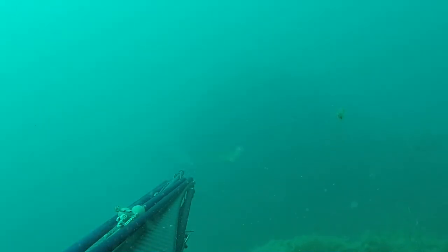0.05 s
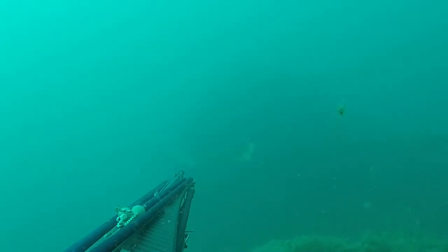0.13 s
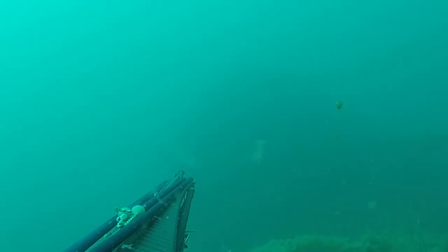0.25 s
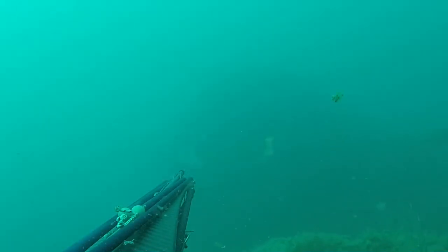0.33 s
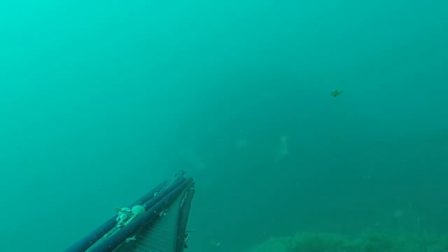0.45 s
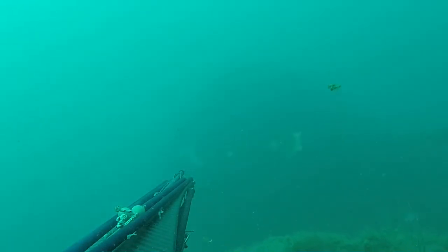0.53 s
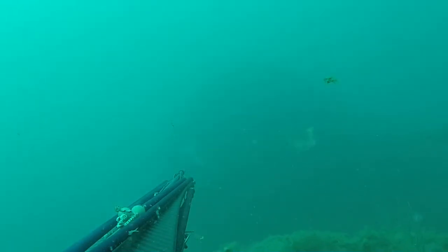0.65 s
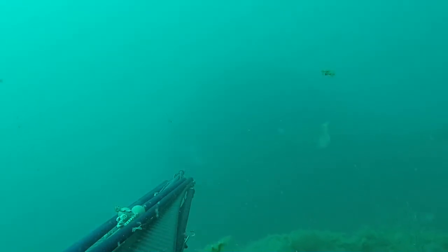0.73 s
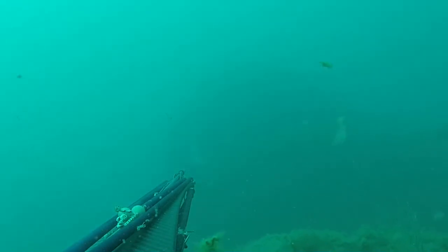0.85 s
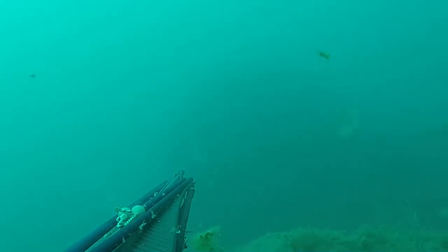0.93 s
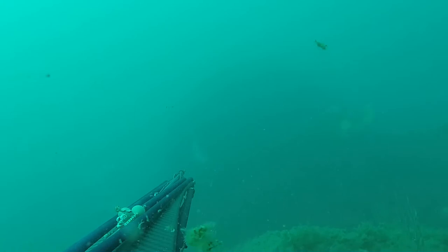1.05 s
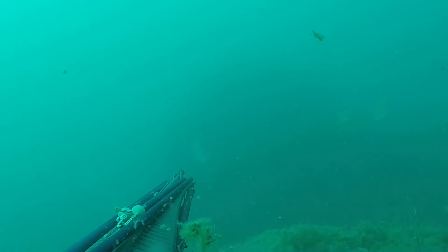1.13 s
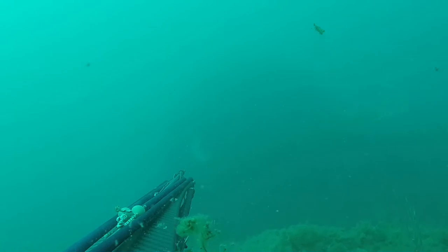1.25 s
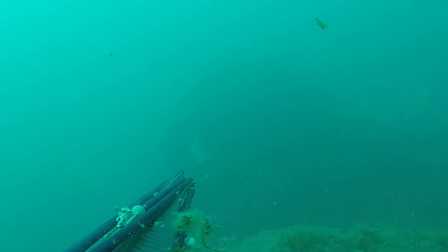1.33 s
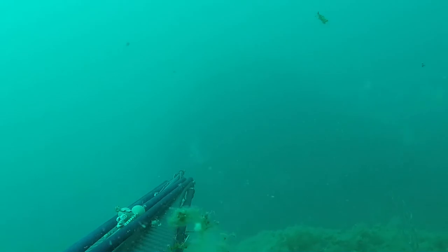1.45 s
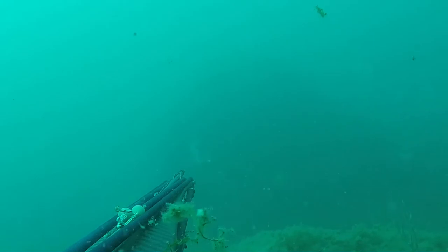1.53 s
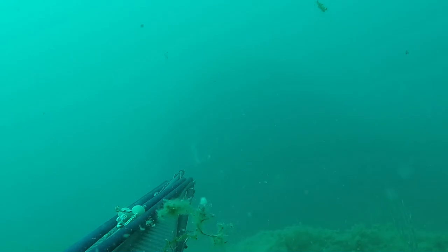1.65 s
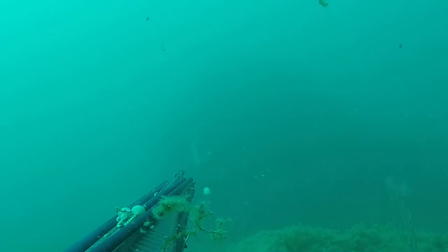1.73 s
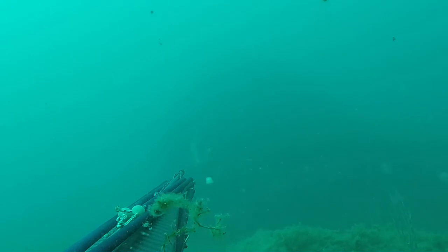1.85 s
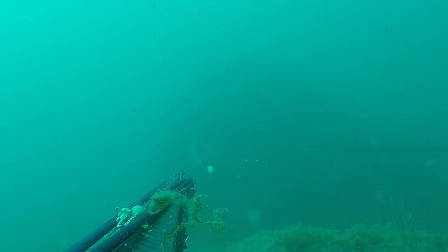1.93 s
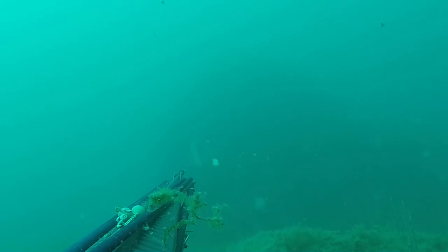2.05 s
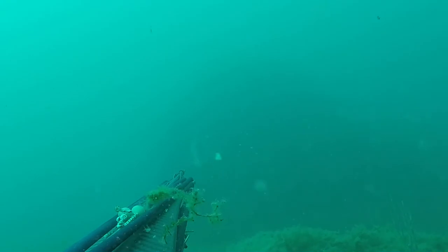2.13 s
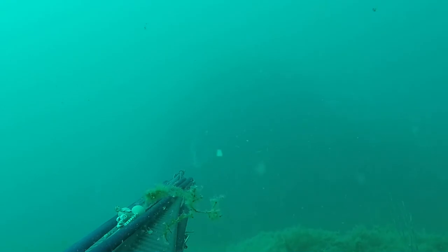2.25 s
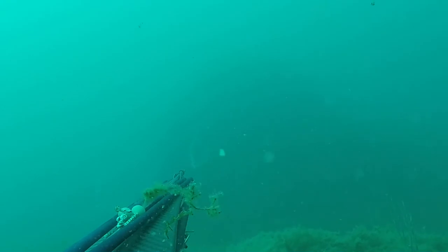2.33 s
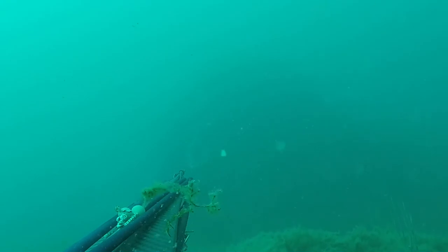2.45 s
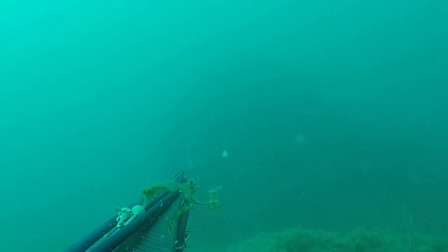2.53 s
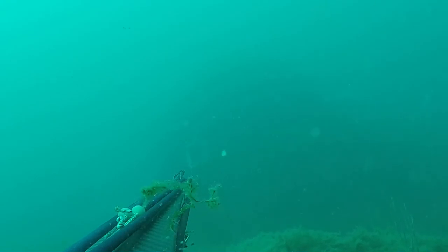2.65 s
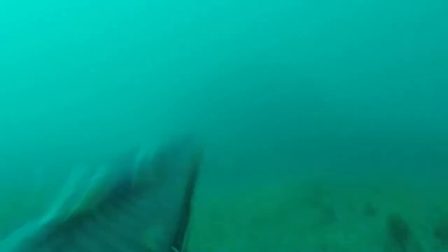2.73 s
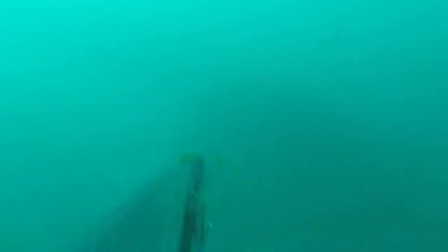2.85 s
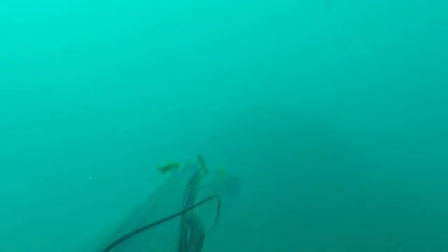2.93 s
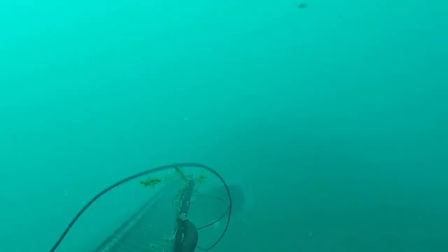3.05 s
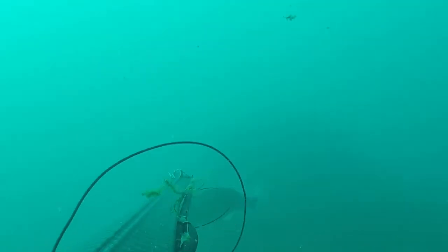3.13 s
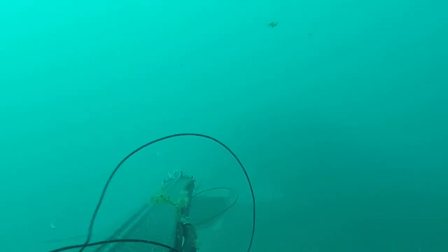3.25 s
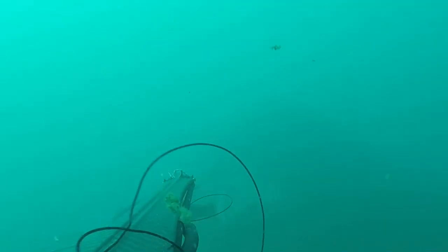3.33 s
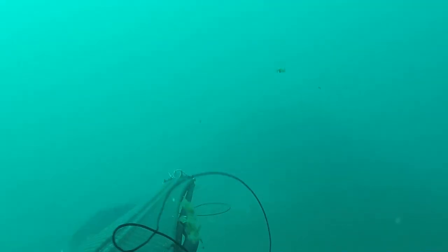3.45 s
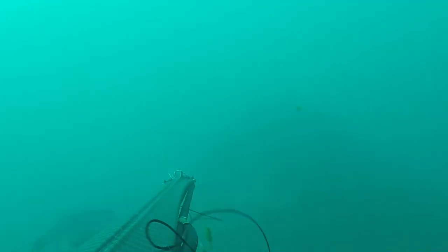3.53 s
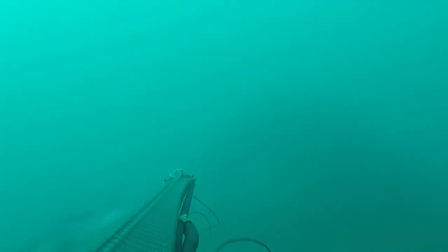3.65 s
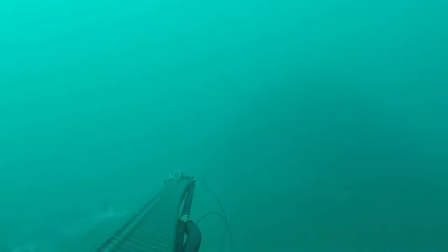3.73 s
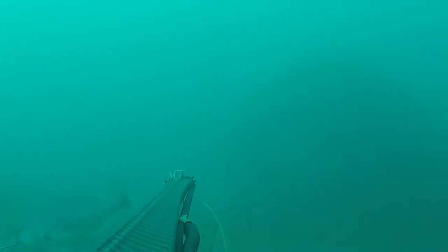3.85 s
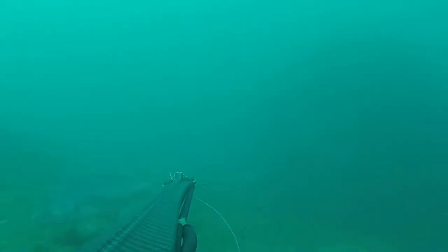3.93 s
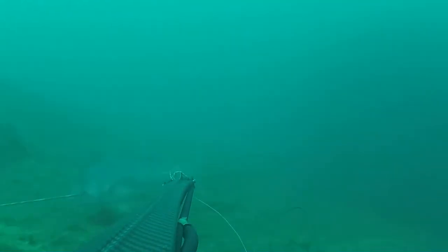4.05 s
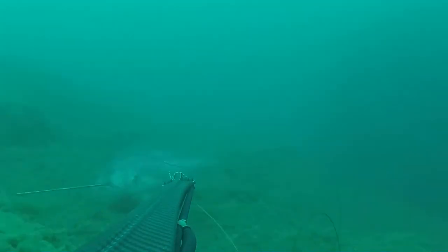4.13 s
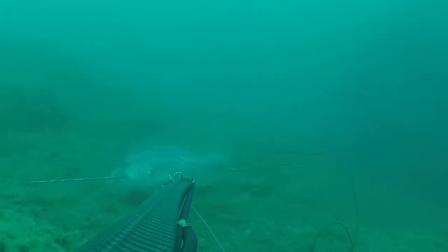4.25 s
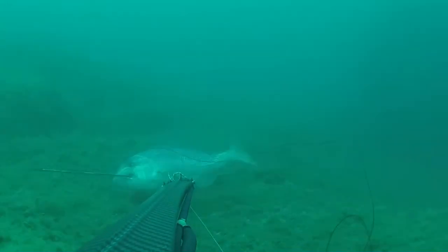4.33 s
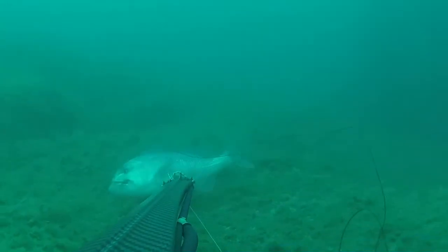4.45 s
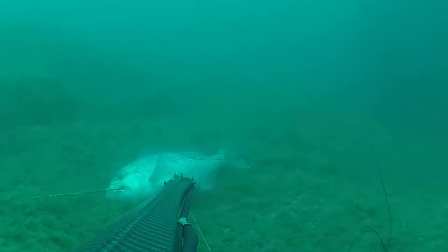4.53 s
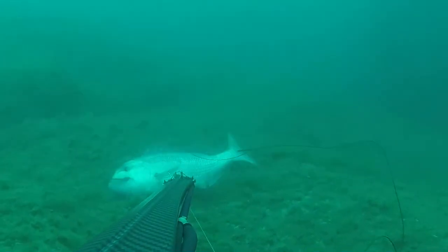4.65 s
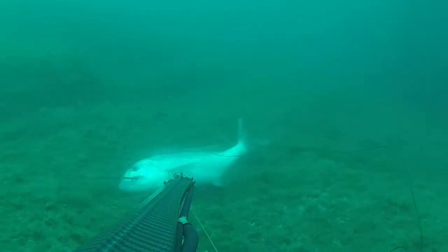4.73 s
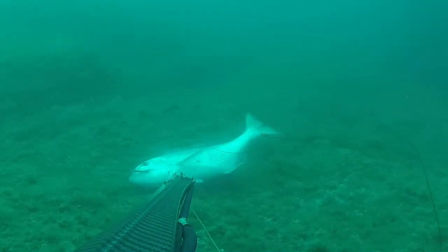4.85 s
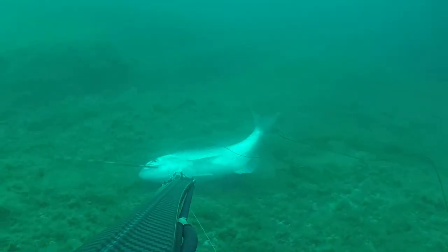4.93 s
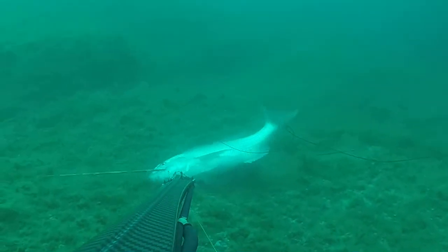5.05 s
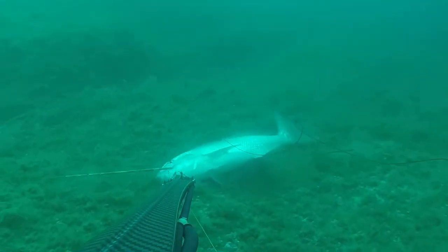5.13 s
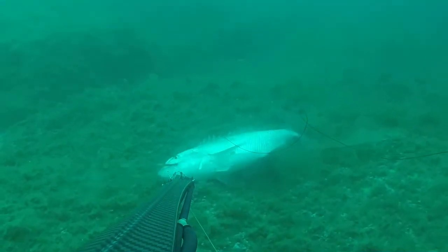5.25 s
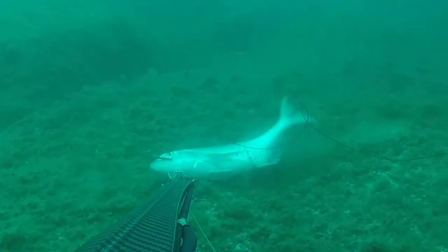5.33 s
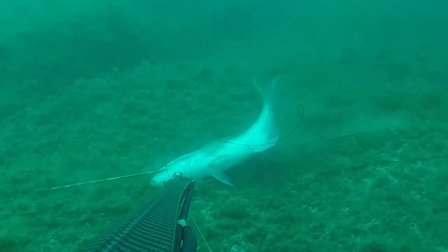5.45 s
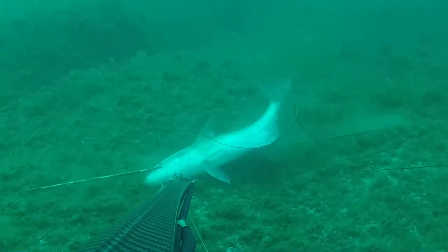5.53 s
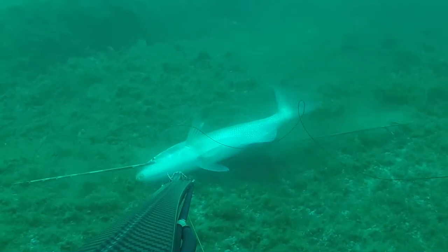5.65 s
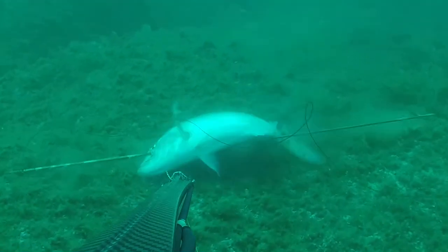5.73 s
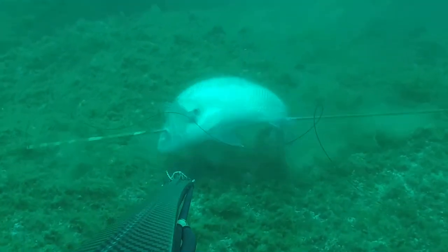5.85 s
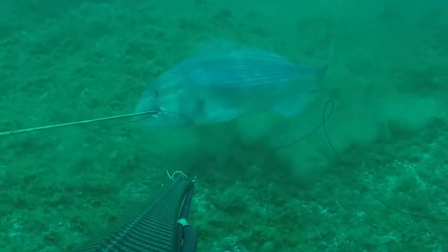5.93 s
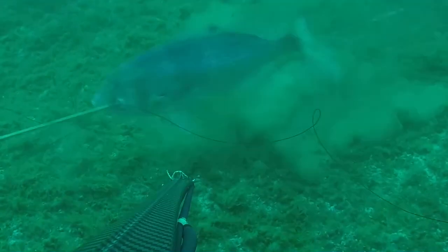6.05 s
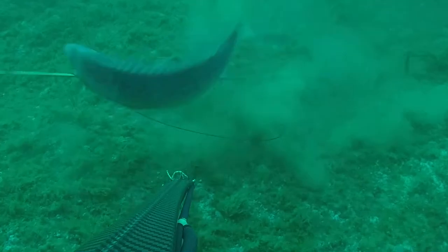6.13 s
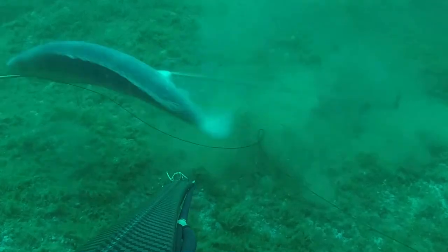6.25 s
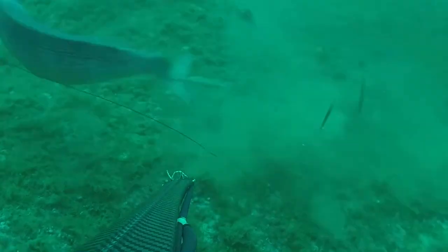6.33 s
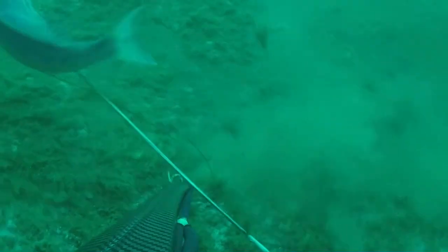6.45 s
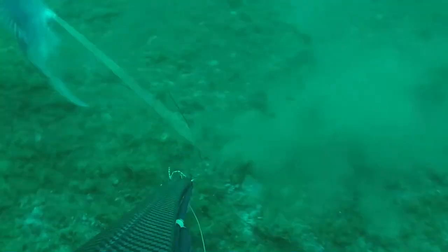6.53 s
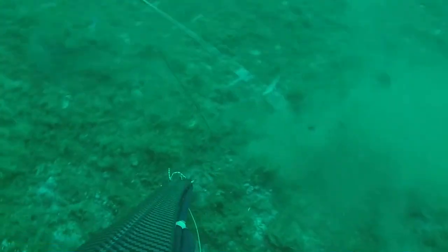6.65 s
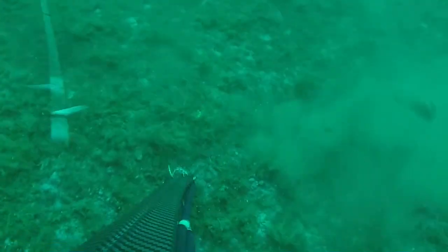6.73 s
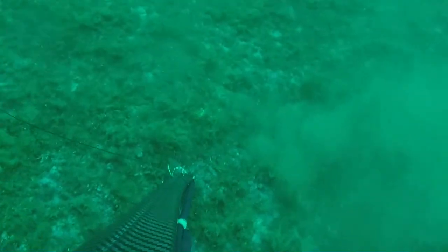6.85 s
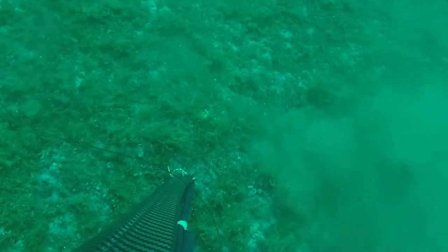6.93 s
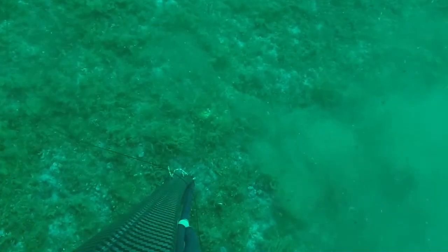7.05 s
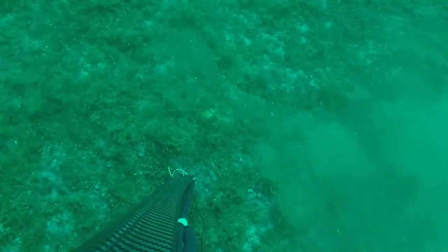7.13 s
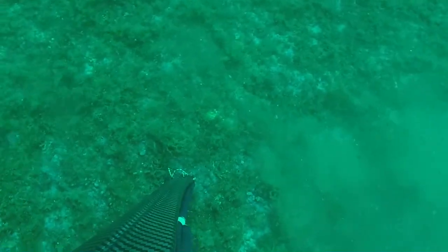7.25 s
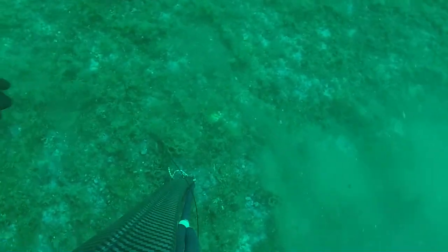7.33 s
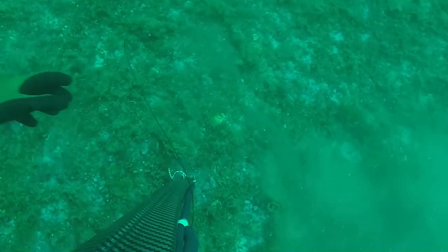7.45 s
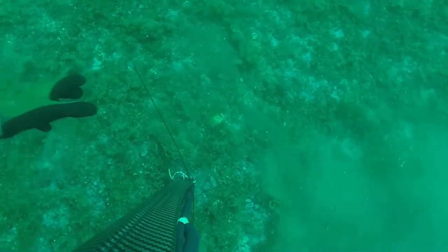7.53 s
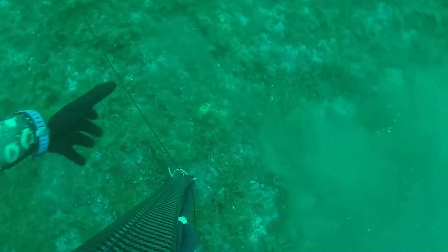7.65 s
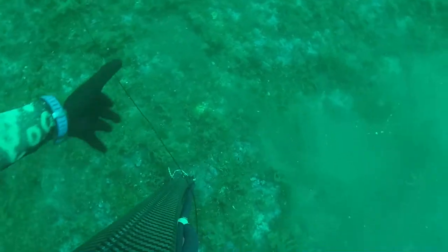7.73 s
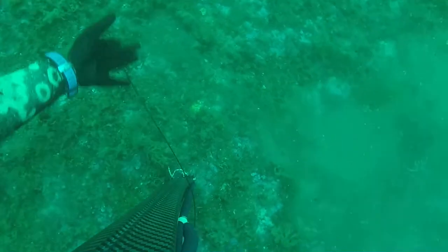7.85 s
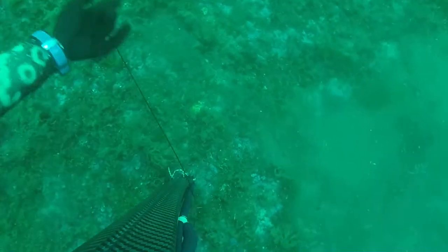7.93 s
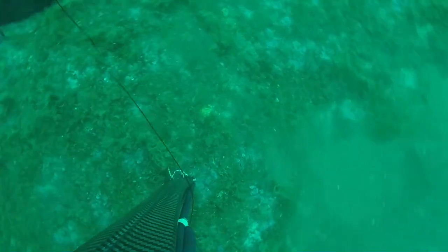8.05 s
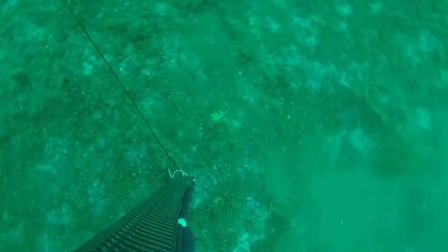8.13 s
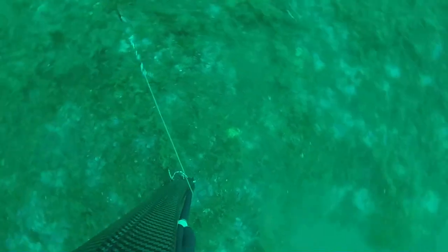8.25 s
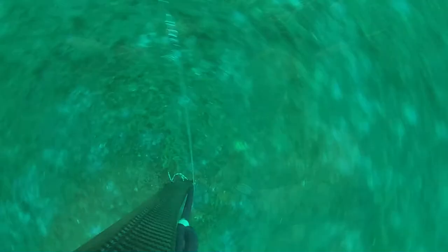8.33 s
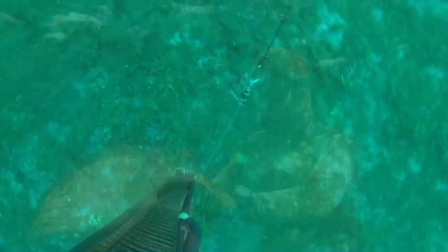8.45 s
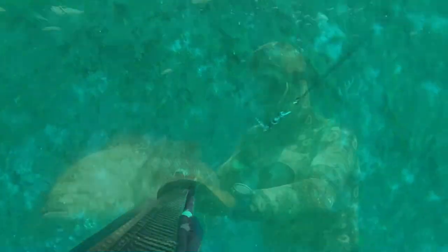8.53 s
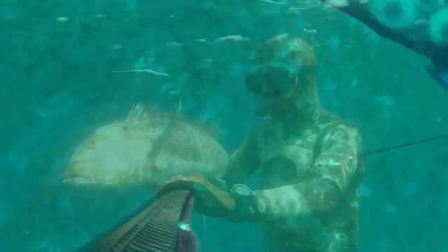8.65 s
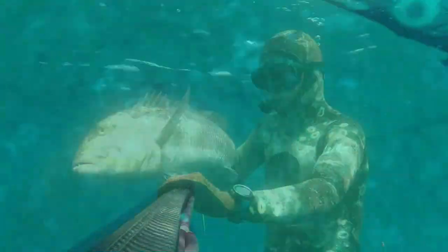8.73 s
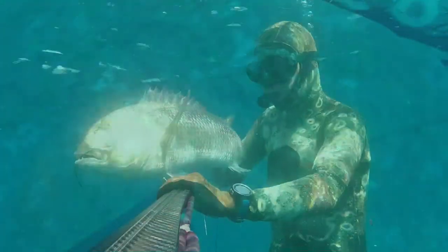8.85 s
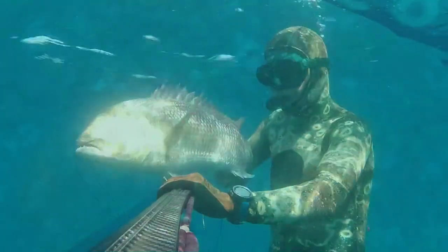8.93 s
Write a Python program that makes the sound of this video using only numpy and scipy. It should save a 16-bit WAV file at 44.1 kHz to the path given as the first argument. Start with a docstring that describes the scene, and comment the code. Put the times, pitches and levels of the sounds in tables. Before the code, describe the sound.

Under water, heard inside a housing on a speargun. From 0 to 2.9 seconds there is only a quiet, low-weighted hiss with faint fizzing shrimp crackle and a few nearer tiny snaps. At about 2.95 a violent, overloaded crack rings the housing, the shaft scrapes out in rough grains, and hollow knocks rattle until 3.3 over a short deep throb. A brief lull of surging water follows. From 4 to 6 seconds, irregular taps, sharp knocks and faint line zips mix with gurgles, rustling and soft low tail thumps near 4.9, 5.1 and 5.5. Knocks thicken from 6.3, with a very hard one at 6.65 and more clatter to 7.0. Until 8.3 it is calmer: swirling water, rubbing line, light taps, bright ticks. From 8.3 to the end, heavy knocks, bumps, scrapes and loud, low water surges suggest rough handling.

```python
"""A speargun is fired under water, heard from inside a camera housing fixed to the gun.
First the seabed hisses and shrimp snap, made of filtered noise and tiny clicks, with faint water and fizz.
Then the shaft cracks loose, a burst of blows that rings the housing, and drags its line out as rough grains.
Line and fittings knock and tap on the gun, and running line sings, while the fish's tail beats as low pushes.
Water surges and gurgles round the moving gun, and at the end the gun is handled roughly."""
import sys
import numpy as np
from scipy import signal
from scipy.fft import rfft, irfft, next_fast_len
from scipy.io import wavfile
from scipy.ndimage import uniform_filter1d, map_coordinates

SR = 44100
rng = np.random.default_rng(int(sys.argv[2]) if len(sys.argv) > 2 else 0)


def store_pcm(level_fs):
    """Save levels as 16-bit WAV."""
    pcm = np.round(np.clip(level_fs, -1, 1) * 32767).astype(np.int16)
    wavfile.write(sys.argv[1], SR, np.atleast_2d(pcm).T)


N = 396018  # length of the scene in samples


def amp(db):
    """Turn decibels into a gain."""
    return 10 ** (np.asarray(db) / 20)


def unit(x):
    """Scale x to rms 1."""
    return x / np.sqrt(np.mean(x ** 2) + 1e-20)


def peaked(x):
    """Scale x to peak 1."""
    return x / (np.abs(x).max() + 1e-20)


def curves(rows):
    """Draw straight lines between the rows: one value per sample for each column after the time."""
    s, *columns = np.transpose(rows)
    return [np.interp(np.arange(N) / SR, s, column) for column in columns]


def wobble(rate):
    """A smooth random curve through rate random points a second."""
    points = rng.standard_normal(int(N * rate / SR) + 4)
    return map_coordinates(points, [np.arange(N) * rate / SR])


def add(track, s, sound):
    """Mix a sound into the track at time s."""
    part = track[max(round(s * SR), 0):][:len(sound)]
    part += sound[:len(part)]


def coloured(x, points):
    """Filter x with the (Hz, dB) points as gain; the filter never sounds ahead of its input."""
    size = 2 * next_fast_len(len(x) // 2 + 2048)
    hz, db = np.transpose(points)
    bins_hz = np.fft.rfftfreq(size, 1 / SR)
    log_gain = np.log(amp(np.interp(np.log(bins_hz + 1), np.log(hz), db)))
    # fold the cepstrum forward in time to get the minimum-phase filter
    cepstrum = irfft(log_gain)
    cepstrum[1:size // 2] *= 2
    cepstrum[size // 2 + 1:] = 0
    return irfft(rfft(x, size) * np.exp(rfft(cepstrum)))[:len(x)]


def noise(points):
    """Coloured noise of rms 1."""
    return unit(coloured(rng.standard_normal(N), points))


def grains(rate, spread_db):
    """Tiny random clicks of either sign and uneven size, about rate a second."""
    happens = rng.random(N) < rate / SR
    sign = rng.choice([-1, 1], N)
    return happens * sign * amp(spread_db * np.clip(rng.standard_normal(N), -2, 2))


def patchy(x, depth_db, size=512):
    """Shift the colour of x at random from moment to moment; rms 1."""
    spectrum = signal.stft(x, nperseg=size)[2]
    field = uniform_filter1d(rng.standard_normal(spectrum.shape), size=5, axis=0)
    field = uniform_filter1d(field, size=4, axis=1)
    shifted = spectrum * amp(depth_db * np.tanh(unit(field)))
    return unit(signal.istft(shifted, nperseg=size)[1][:N])


def stroke(length, attack, t60):
    """An envelope that rises, holds until length seconds and dies away by 60 dB in t60 seconds."""
    t = np.arange(SR) / SR
    return (1 - np.exp(-t / attack)) * amp(-60 * np.maximum(t - length, 0) / t60)


def tick(t, t60, points):
    """A very short burst of coloured noise, peak 1."""
    return peaked(coloured(rng.standard_normal(len(t)) * amp(-60 * t / t60), points))


# ringing modes of the gun and camera housing: pitch_hz, drive_db (relative), t60_s (time to fall 60 dB)
HOUSING_MODES = [(230, -17.5, 0.11), (426, -15.5, 0.083), (873, -15, 0.057), (1204, -11, 0.015),
                 (1478, -5.5, 0.015), (1844, -5.5, 0.019), (2068, -7, .012), (2346, -15.5, 0.021),
                 (2553, -17.5, 0.033), (3210, -24.5, 0.054), (3620, -36, .01)]


def ring(t, centre_hz, focus, scatter_db):
    """The housing's modes after one contact; those near its centre are driven up to focus dB harder."""
    hz, db, t60 = np.transpose(HOUSING_MODES)[:, :, None]
    octaves_away = np.minimum(np.abs(np.log2(hz / centre_hz)), 1)
    drive = amp(db - focus * octaves_away + scatter_db * rng.standard_normal(hz.shape))
    # neighbouring modes start in opposite directions, so the ring swells for a few cycles and beats
    sign = (-1) ** np.arange(len(HOUSING_MODES))[:, None]
    return np.sum(sign * drive * amp(-60 * t / t60) * np.sin(2 * np.pi * hz * t), axis=0)


# colour of the steady hiss: pitch_hz, level_db (relative)
STILL_COLOUR = [(12, -33.5), (20, 6), (38, 5), (77, -3.5), (210, -4), (558, -11.5), (1260, -14),
                (2460, -19.5), (3440, -26), (4670, -24.5), (5850, -31.5), (8180, -33), (12800, -41.5),
                (14700, -35), (16000, -68.5)]
# colour of snaps and crackle: pitch_hz, level_db (relative)
FIZZ_COLOUR = [(2000, -14), (3000, -0.5), (3500, 6.5), (4600, -10.5), (5750, 7), (6700, 1.5), (8300, -8),
               (9700, -6.5), (11000, -12.5), (12700, -5.5), (15000, -23.5)]


def seabed():
    """A quiet steady hiss with the crackle of shrimp near and far, the far ones in soft clusters."""
    near = unit(coloured(grains(rate=14, spread_db=4), FIZZ_COLOUR))
    clusters = amp(3 * wobble(7))
    far = unit(coloured(grains(rate=600, spread_db=5), FIZZ_COLOUR)) * clusters
    return amp(-56.5) * noise(STILL_COLOUR) + amp(-76.5) * far + amp(-70.5) * near


def gurgles(rate):
    """Small pockets of water flex and ring for a few low cycles each, rate a second; rms 1."""
    out, t = np.zeros(N), np.arange(SR // 10) / SR
    for when, pitch, size in rng.random((round(rate * N / SR), 3)):
        hz = 150 * 2 ** (1.5 * pitch)
        envelope = (1 - np.exp(-t / .003)) * amp(-60 * t * hz / 13)
        add(out, when * N / SR, amp(9 * size) * np.sin(2 * np.pi * hz * t) * envelope)
    return unit(out)


# water round the gun and loose line rubbing on it, before each layer's trim:
# time_s, surge_db, churn_db, rustle_db, fizz_db
FLOW_LEVELS = [(2.65, -82, -78.0, -71, -65), (2.87, -53, -68.5, -72.0, -64.5),
               (3.4, -42.5, -60.5, -65.5, -85), (3.72, -55.5, -69.5, -70.0, -67),
               (3.92, -47, -47.5, -50.5, -71), (4.05, -47.5, -58, -65.5, -62), (4.25, -41, -60, -48, -68.5),
               (4.62, -47, -50, -71, -58.5), (4.97, -43.5, -61, -58.5, -60),
               (5.33, -49.0, -59.5, -59.5, -64.5), (5.85, -49.5, -61, -58.5, -63),
               (6.5, -36.5, -49.5, -64.5, -65), (6.81, -48, -58.0, -59, -72), (7.0, -37.5, -53, -50, -73),
               (7.24, -50, -56, -61, -71.0), (7.75, -41, -45.5, -52, -57.5),
               (8.16, -43.5, -52, -69.5, -56.5), (8.33, -30, -34.5, -40, -58),
               (8.48, -31.5, -39.5, -49.5, -56), (8.66, -18, -27.0, -24, -69), (8.89, -18.5, -29, -44, -54),
               (8.95, -34.5, -45, -62.0, -67)]
# the recoil and tugs on the line shove the gun through the water: start_s, length_s, level_db
SHOVE_TIMES = [(2.93, 0.26, -25.5), (6.65, .02, -29), (6.884, 0.026, -27)]
# colours of surging water, churning water and rubbing line: pitch_hz, level_db (relative)
SURGE_COLOUR = [(12, -18), (22, 7), (33, 1), (50, -2), (68, 1.5), (85, -6.5), (120, -11), (180, -38.5),
                (400, -70.5)]
CHURN_COLOUR = [(70, -36), (120, 3), (180, -3.5), (235, 5), (310, -9.5), (405, -10.5), (500, -9.5),
                (700, -14), (1100, -53)]
RUB_COLOUR = [(120, -26), (300, -13.5), (405, 7), (520, -13.5), (700, -9), (850, 1.5), (980, -1),
              (1200, 1.5), (1450, -2), (1650, -4.5), (1900, -2.5), (2400, -8), (3000, -12.5), (3600, -15),
              (4800, -21), (8000, -40.5), (16000, -65.5)]


def water():
    """Water surges and gurgles and loose line rustles: faint at first, stronger once the gun moves."""
    surge_db, churn_db, rustle_db, _ = curves(FLOW_LEVELS)
    shoves = np.zeros(N)
    for s, length, db in SHOVE_TIMES:
        add(shoves, s, amp(db) * stroke(length, attack=0.0055, t60=0.31))
    swirl = patchy(noise(CHURN_COLOUR), depth_db=5, size=1024) * amp(3 * np.tanh(wobble(35)))
    eddies = unit(swirl + .9 * gurgles(rate=55))
    rubs = coloured(grains(rate=1200, spread_db=6), RUB_COLOUR)
    rubbing = patchy(rubs, depth_db=7) * unit(amp(4.5 * np.tanh(wobble(70))))
    # steady flow and shoves add up as powers
    surge = np.hypot(amp(surge_db), shoves) * noise(SURGE_COLOUR)
    churn = np.hypot(amp(churn_db + 2.0), amp(-22.5) * shoves) * eddies
    line = amp(rustle_db + 1.0) * rubbing
    return surge + churn + line


def fizz():
    """Silt and tiny bubbles crackle past the gun in uneven swishes of small clicks."""
    fizz_db = curves(FLOW_LEVELS)[3]
    specks = coloured(grains(rate=2500, spread_db=7), FIZZ_COLOUR)
    crackle = patchy(specks, depth_db=6, size=1024) * amp(2.5 * np.tanh(wobble(35)))
    swish = amp(3 * np.tanh(wobble(20)))
    return amp(fizz_db - 1.5) * swish * crackle


# the nearest shrimp snaps and small ticks: start_s, level_db (before a fixed trim)
SNAP_TIMES = [(0.2485, -29.5), (.5145, -36), (0.617, -34), (1.02, -36), (1.2455, -33), (1.3505, -33),
              (1.651, -36), (1.8087, -36), (2.149, -35), (2.2784, -26), (2.3728, -28.5), (2.762, -24.5),
              (2.7878, -28), (4.5632, -24), (5.0833, -19.5), (5.476, -15.5), (6.9461, -22), (7.277, -19),
              (7.283, -24.5), (7.289, -26), (6.2489, -28.5), (7.7288, -24), (8.0873, -25), (8.4406, -19),
              (8.6527, -16)]


def snaps():
    """The nearest shrimp snaps and small ticks, each a tiny burst of bright noise."""
    out, t = np.zeros(N), np.arange(SR // 40) / SR
    for s, db in SNAP_TIMES:
        add(out, s, amp(db - 5.5) * tick(t, t60=0.015, points=FIZZ_COLOUR))
    return out


# line, shaft and gloves sliding on the gun:
# start_s, length_s, level_db (before the layer trims), treble_db (relative to the level)
SCRAPE_TIMES = [(2.928, 0.0074, -27.5, -21), (2.989, 0.016, -22.5, -17), (3.044, .018, -28, -7.5),
                (3.167, 0.009, -19.5, -34), (4.572, 0.076, -52, 4), (5.458, 0.047, -46, -5),
                (6.646, 0.028, -23, -13), (6.673, 0.017, -35, -14), (6.879, 0.015, -22.5, -24.5),
                (6.923, .014, -26.5, -21), (7.074, 0.063, -45.5, -25), (7.787, 0.122, -48, -3.5),
                (8.322, .02, -33.5, -33), (8.374, 0.0057, -27, 5), (8.466, .06, -35, -36),
                (8.803, 0.032, -23, -17.5), (8.836, 0.049, -17.5, -10)]
# the shaft runs out along the barrel; treble is relative to the body
RUN_DB, RUN_TREBLE_DB, JUDDER_DB = -28, -8.5, 6.5
RUN_HOLD_S, RUN_FADE_DB_PER_S, RUN_S = 0.067, 100.5, .3
# each tail beat drags the line over grit, starting just ahead of the beat
GRIT_LEAD_S, GRIT_S, GRIT_BELOW_BEAT_DB, GRIT_TREBLE_DB = 0.0056, 0.022, 24.5, -6


def drag():
    """How hard things slide: body and treble envelopes of the running shaft, scrapes and grit."""
    body, treble = np.zeros(N), np.zeros(N)
    t = np.arange(round(RUN_S * SR)) / SR
    fade_db = RUN_FADE_DB_PER_S * np.maximum(t - RUN_HOLD_S, 0)
    run = amp(RUN_DB - fade_db + JUDDER_DB * np.tanh(wobble(90)[:len(t)]))
    add(body, RELEASE[0], run)
    add(treble, RELEASE[0], amp(RUN_TREBLE_DB) * run)
    grit = [(s - GRIT_LEAD_S, GRIT_S, db - GRIT_BELOW_BEAT_DB, GRIT_TREBLE_DB) for s, db, hz in THUMP_TIMES]
    for s, length, db, treble_db in SCRAPE_TIMES + grit:
        slide = stroke(length, attack=0.0029, t60=0.018)
        add(body, s, amp(db) * slide)
        add(treble, s, amp(db + treble_db) * slide)
    return body, treble


# colour of the scraping treble: pitch_hz, level_db (relative)
HISS_COLOUR = [(1500, -21), (2600, 3.5), (3400, 1.5), (4600, -6), (5900, 4), (7200, -7.5), (9000, -11.5),
               (12500, -16.5), (15500, -27.5)]


def scrapes():
    """Sliding contacts catch and slip thousands of times a second, rubbing and ringing the housing."""
    body, treble = drag()
    t = np.arange(SR // 4) / SR
    slips, fine = grains(rate=6000, spread_db=3), grains(rate=9000, spread_db=6)
    grip = unit(amp(2.5 * np.tanh(wobble(200))))
    modes = ring(t, centre_hz=1700, focus=2, scatter_db=0)
    ringing = unit(signal.fftconvolve(slips * grip, modes)[:N])
    rubbing = grip * patchy(coloured(slips, RUB_COLOUR), depth_db=3, size=128)
    hiss = grip * patchy(coloured(fine, HISS_COLOUR), depth_db=6, size=128)
    return body * (amp(2.0) * rubbing + amp(-11.5) * ringing) + amp(-0.5) * treble * hiss


# the release of the shaft: start_s, level_db (before a fixed boost), length_s (of the full-force blows)
RELEASE = (2.9476, 0.67, 0.0047)
# colour of the crack: pitch_hz, level_db (relative)
CRACK_COLOUR = [(40, -17.5), (300, -7), (700, -5.5), (1000, 1), (1400, 3), (2200, -2), (3200, -9),
                (4500, -9.5), (6200, -18.5), (9000, -31), (16000, -29)]


def shot():
    """The trigger lets go: a few milliseconds of violent blows shake the housing."""
    s, db, length = RELEASE
    out, t = np.zeros(N), np.arange(SR // 8) / SR
    blows = rng.standard_normal(len(t)) * amp(-60 * np.maximum(t - length, 0) / 0.0093)
    body = peaked(ring(t, centre_hz=1700, focus=6, scatter_db=1))
    add(out, s, amp(db + 6.5) * (peaked(coloured(blows, CRACK_COLOUR)) + body / 2))
    return out


# colour of a knock's bright edge: pitch_hz, level_db (relative)
EDGE_COLOUR = [(1500, -34), (2600, -6), (3500, 15.5), (4600, -6.5), (5800, 5.5), (6600, 2.5), (8000, -9.5),
               (9700, -20.5), (11000, -23), (12700, -21.5), (16000, -47.5)]
# how much more weakly a knock drives the modes an octave or more from its centre
FOCUS_DB = 16


def knock(db, centre_hz, edge_db):
    """One tap on the gun: a ring damped by the water, a bright edge and a faint chatter."""
    t = np.arange(SR // 16) / SR
    detune, damping = rng.uniform(-1, 1, 2)
    # each spot on the gun rings a little differently
    body = peaked(ring(t * (1 + 0.042 * detune), centre_hz, focus=FOCUS_DB, scatter_db=3.5))
    # the tapping part adds a brief note of its own
    own_envelope = (1 - np.exp(-t / 0.0015)) * amp(-60 * t / (0.0028 * 2 ** damping))
    own = np.sin(2 * np.pi * centre_hz * t) * own_envelope
    edge = amp(edge_db) * tick(t, t60=0.013, points=EDGE_COLOUR)
    chatter = amp(-11.5) * tick(t, t60=0.014, points=RUB_COLOUR)
    return amp(db - 2.5) * (peaked(body + amp(-11.5) * own) + edge + chatter)


# hard contacts on the gun:
# start_s, level_db (before a fixed trim), centre_hz, edge_db (treble, relative to the level)
KNOCK_TIMES = [(2.9591, -7, 2240, -14), (2.9834, -16.5, 1160, -20), (3.003, -5, 1184, -28),
               (3.0251, -3.5, 1380, -9), (3.074, -5.5, 1180, -8.5), (3.0963, -3.5, 1210, -19),
               (3.1234, -5.5, 1510, -13), (3.1385, -10, 1920, -29), (3.1679, -13.5, 1400, -2),
               (3.1751, -6, 2010, -9.5), (3.1965, -13.5, 1860, -27), (3.217, -9, 1360, -11),
               (3.2494, -25.5, 1900, -17), (3.276, -23.5, 1720, -19), (3.297, -26, 1510, -9.5),
               (3.3389, -31.5, 1470, -12.5), (3.4951, -26, 1470, -7), (3.9961, -16, 1830, -22),
               (4.0645, -19.5, 1850, -15), (4.128, -25, 1480, -25), (4.1346, -8.5, 1880, -20),
               (4.155, -23.5, 1440, -7), (4.215, -20, 1500, -10), (4.2231, -20.5, 1410, -19),
               (4.2612, -27.5, 2710, -11), (4.3332, -26, 1890, -33), (4.3533, -7.5, 1710, -27),
               (4.386, -19, 1870, -17), (4.421, -23, 1570, -34), (4.4254, -7, 1800, -9.5),
               (4.6956, -12.5, 1910, -40), (4.7499, -21.5, 1420, -3.5), (4.8286, -22, 1720, -32),
               (5.037, -11.5, 1820, -17.5), (5.0553, -25, 1820, -15), (5.1469, -24, 1460, -11),
               (5.6625, -26, 1470, -2.5), (5.7129, -19, 1410, -17), (5.789, -29, 1490, -31),
               (5.8718, -20.5, 1470, -23), (6.3017, -18.5, 1400, -12), (6.316, -28, 1450, -16),
               (6.3614, -15, 1770, -24), (6.3734, -14.5, 1840, -12.5), (6.3982, -15.5, 1650, -16),
               (6.4306, -12, 1730, -20), (6.4377, -16.5, 1500, -9), (6.466, -18.5, 1490, -12),
               (6.5044, -16.5, 1540, -28), (6.541, -19.5, 1760, -18), (6.5964, -11, 1790, -18.5),
               (6.6079, -14.5, 1490, -14), (6.6507, 6.5, 1990, -15), (6.6666, -11, 1940, -19),
               (6.7066, -12, 1920, -9), (6.7248, -13, 2040, -19), (6.784, -23, 1880, -31),
               (6.881, -12, 1370, -15), (6.9154, -6, 2050, -9), (6.9212, -5.5, 2080, -8.5),
               (6.9511, -17, 2030, -24), (6.9713, -20.5, 1850, -11), (6.9893, -15.5, 1960, -16.5),
               (7.0731, -24, 1500, -2), (7.1596, -27, 1840, -37), (7.333, -25.5, 1220, -26),
               (7.494, -23.5, 2460, 4.5), (8.3403, -1.5, 1690, -24), (8.4009, -14, 1650, -31),
               (8.5227, 0.5, 1930, -43), (8.5306, -2.5, 1470, -14), (8.5589, -5, 1580, -11.5),
               (8.5985, -8, 1260, -21), (8.6338, -11.5, 1430, -2.5), (8.701, -6, 1260, -7.5),
               (8.7154, 2, 1810, -42), (8.8762, 0, 1850, -16), (8.9074, -6.5, 1410, -6),
               (8.9238, 2, 1470, -14.5), (8.9268, -5, 1500, -16)]


def knocks():
    """Line and fittings hit the gun, each at its own spot and with its own force."""
    out = np.zeros(N)
    for s, db, centre_hz, edge_db in KNOCK_TIMES:
        add(out, s, knock(db, centre_hz, edge_db))
    return out


# the whole gun swinging after a jerk on the line: start_s, level_db (before the swing's rise and decay)
SWAY_TIMES = [(3.034, -16), (6.701, -27.5), (6.9, -23.5)]
SWAY_HZ, SWAY_T60_S = 64.9, 0.26


def sways():
    """A jerk sets the long gun swinging in a deep throb that dies away."""
    out, t = np.zeros(N), np.arange(SR // 2) / SR
    for s, db in SWAY_TIMES:
        envelope = amp(db - 60 * t / SWAY_T60_S) * (1 - np.exp(-t / .004))
        add(out, s, -envelope * np.sin(2 * np.pi * SWAY_HZ * t))
    return out


# light taps follow the rustle level; TAP_MAX_DB caps them ahead of the knock's own trim
TAPS_PER_S, TAP_ABOVE_RUSTLE_DB, TAP_SPREAD_DB, TAP_MAX_DB = 26, 18.5, 8, -25.5
TAP_HZ, TAP_EDGE_DB = 1650, -9  # middle of the random centres and of the random treble edges
SLACK_FROM_S = 3.7  # the line lies slack from here


def taps():
    """Between the hard knocks the slack line keeps tapping the gun lightly, at random."""
    out, rustle_db = np.zeros(N), curves(FLOW_LEVELS)[2]
    for when, force, spot, edge in rng.random((round(TAPS_PER_S * N / SR), 4)):
        s = when * N / SR
        if s > SLACK_FROM_S:
            db = rustle_db[int(when * N)] + TAP_ABOVE_RUSTLE_DB + TAP_SPREAD_DB * (2 * force - 1)
            centre_hz = TAP_HZ * 2 ** (spot - .5)
            edge_db = TAP_EDGE_DB + 10 * (2 * edge - 1)
            add(out, s, knock(min(db, TAP_MAX_DB), centre_hz, edge_db))
    return out


# tail beats and soft bumps: start_s, level_db (before a fixed trim), pitch_hz (before the glide)
THUMP_TIMES = [(3.89, -34, 260), (3.908, -32.5, 192), (4.327, -31.5, 402), (4.399, -32, 402),
               (4.422, -30, 387), (4.867, -18, 184), (4.906, -22, 205), (5.084, -24.5, 186),
               (5.128, -25, 245), (5.483, -23, 182), (5.526, -26.5, 240), (5.93, -35.5, 174),
               (6.144, -23.5, 181), (6.262, -29, 202), (6.412, -24.5, 179), (6.466, -16, 217),
               (6.548, -26.5, 170), (6.902, -21.5, 167), (7.3, -31.5, 207), (7.507, -30.5, 240),
               (7.622, -35, 122), (7.856, -31, 201), (7.99, -29, 220), (8.108, -30.5, 237),
               (8.387, -13.5, 222), (8.748, -19.5, 645), (8.751, -18.5, 232)]


def thumps():
    """Each tail beat or bump pushes the water for a few low cycles and knocks the housing's low mode."""
    out, t = np.zeros(N), np.arange(SR // 8) / SR
    for s, db, hz in THUMP_TIMES:
        # the push starts sharp and slackens
        phase = 2 * np.pi * hz * (0.962 * t + 0.0011 * (1 - np.exp(-t / 0.0039)))
        push = peaked(np.sin(phase) * (1 - np.exp(-t / 0.006)) * amp(-60 * t / 0.061))
        low_mode = np.sin(2 * np.pi * 420 * t) * (1 - np.exp(-t / 0.0033)) * amp(-60 * t / 0.047)
        splash = tick(t, t60=0.055, points=CHURN_COLOUR)
        add(out, s, amp(db - 4.0) * (push + amp(-5.5) * low_mode + amp(0.5) * splash))
    return out


# the line zipping through its guides:
# start_s, length_s, first_hz, last_hz, level_db (rms before the fade in and out)
ZIP_TIMES = [(3.942, 0.027, 700, 1450, -46), (4.022, 0.033, 3180, 3330, -52.5),
             (4.081, .02, 2800, 3280, -48.5), (4.254, .02, 3470, 3240, -40),
             (4.65, 0.16, 1940, 3060, -54.5), (6.129, .025, 5400, 5320, -52), (7.09, .056, 1626, 1380, -46),
             (7.237, 0.21, 1340, 1533, -55.5), (7.821, 0.094, 1500, 1283, -43.5),
             (8.379, 0.0083, 3240, 3240, -21.5)]


def zips():
    """Running line sings in a narrow, rough band whose pitch follows its speed."""
    out = np.zeros(N)
    roughness = wobble(850) + 1j * wobble(850)
    for s, length, first_hz, last_hz, db in ZIP_TIMES:
        u = np.linspace(0, 1, max(round(length * SR), 8))
        phase = 2 * np.pi * np.cumsum(first_hz + (last_hz - first_hz) * u) / SR
        rough_part = roughness[round(s * SR):][:len(u)]
        band = unit(np.real(rough_part * np.exp(1j * phase)))
        add(out, s, amp(db) * band * np.sqrt(np.abs(np.sin(np.pi * u))))
    return out


def ducking(loud, threshold_db, ratio, release_db):
    """Gain control: a loud blow pulls the gain down at once, and it recovers by release_db a second."""
    recovery = release_db * np.arange(N) / SR
    level_db = 20 * np.log10(np.abs(loud) + 1e-9)
    over_db = ratio * np.maximum(level_db - threshold_db, 0)
    return amp(recovery - np.maximum.accumulate(over_db + recovery))


def scene():
    """Everything reaches one microphone inside the housing; the seabed sinks after each loud blow."""
    gun = shot() + knocks() + scrapes() + zips() + thumps() + sways()
    background = ducking(gun, threshold_db=-11.0, ratio=1.0, release_db=20) * seabed()
    return (gun + taps() + snaps() + water() + fizz() + background)[None]


TOP_HZ = 15900  # the camera's band limit


def record(dry):
    """The loudest blows overload the camera, which keeps nothing above its band limit."""
    clipped = .97 * dry / (1 + np.abs(dry) ** 6) ** (1 / 6)
    size = next_fast_len(N + SR // 4)
    kept = np.fft.rfftfreq(size, 1 / SR) < TOP_HZ
    return irfft(rfft(clipped, size) * kept, size)[:, :N]


dry = scene()
out = record(dry)
store_pcm(out)
```